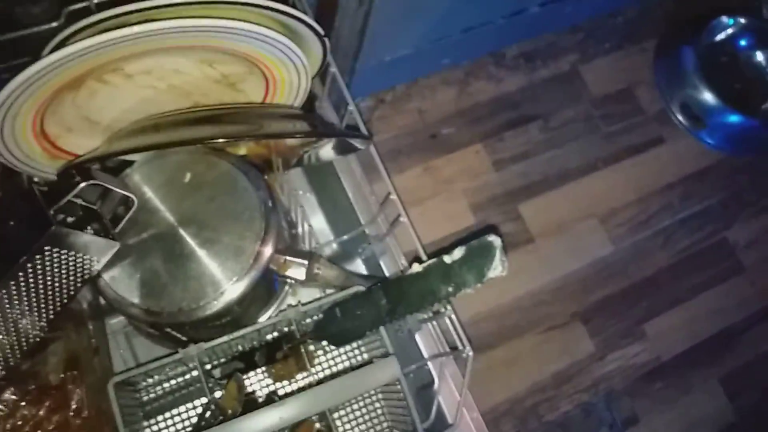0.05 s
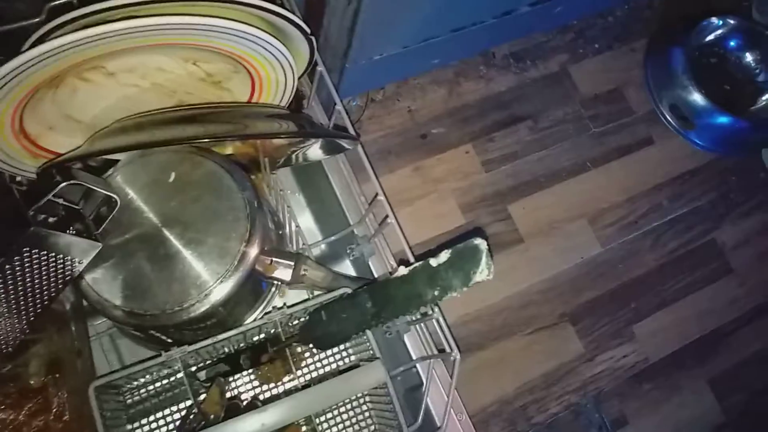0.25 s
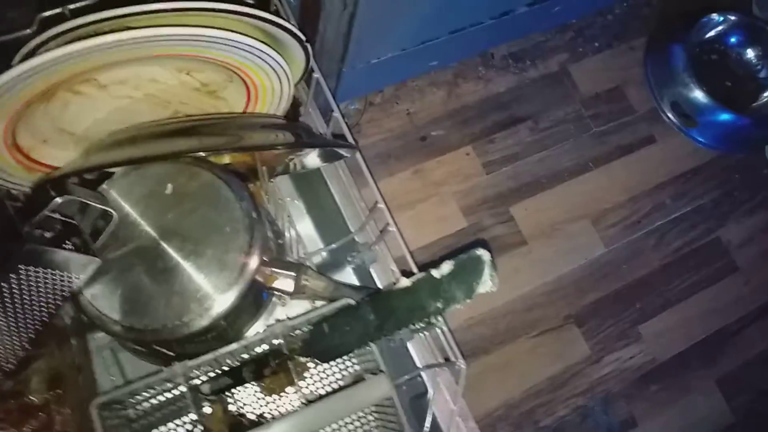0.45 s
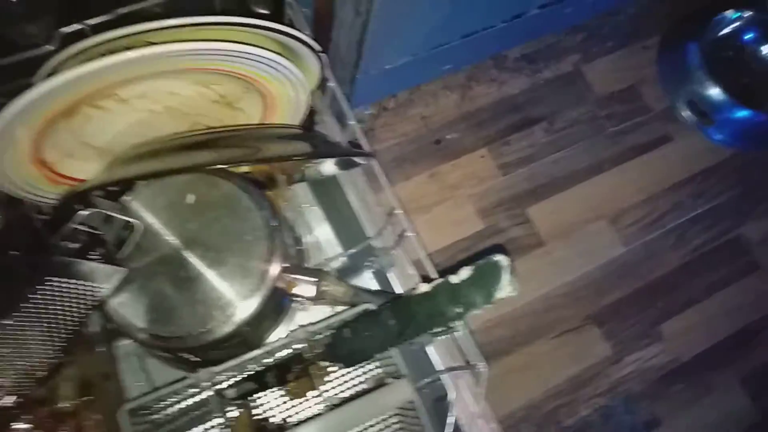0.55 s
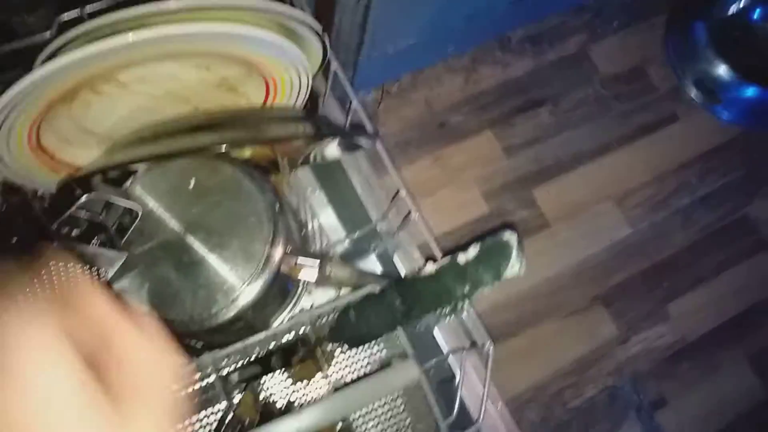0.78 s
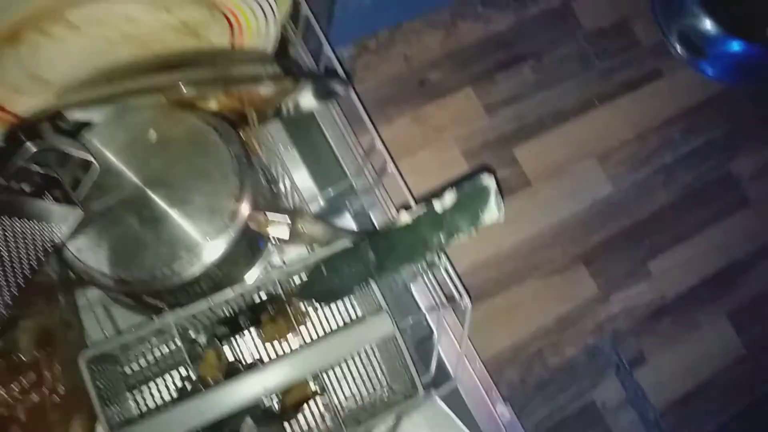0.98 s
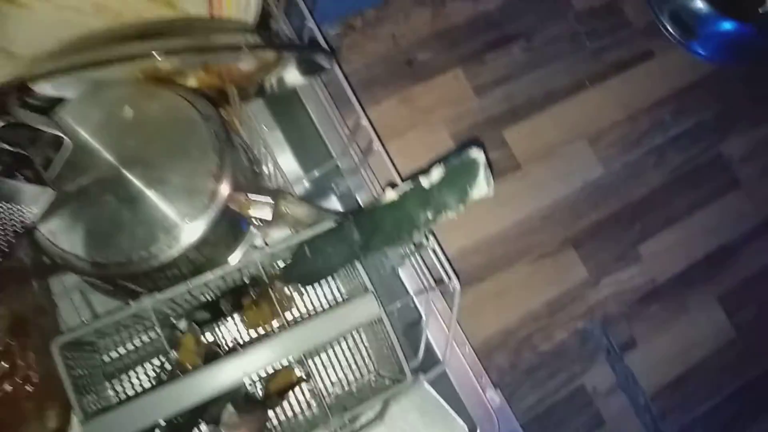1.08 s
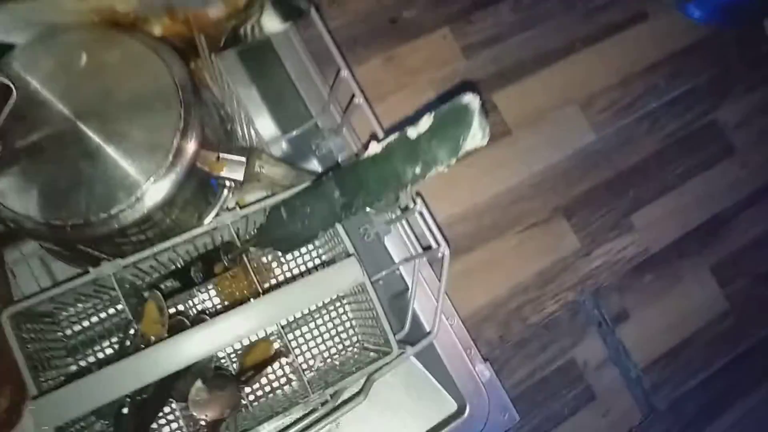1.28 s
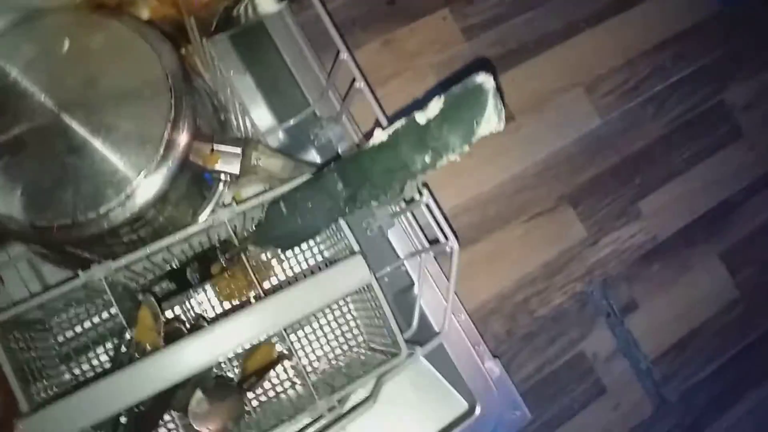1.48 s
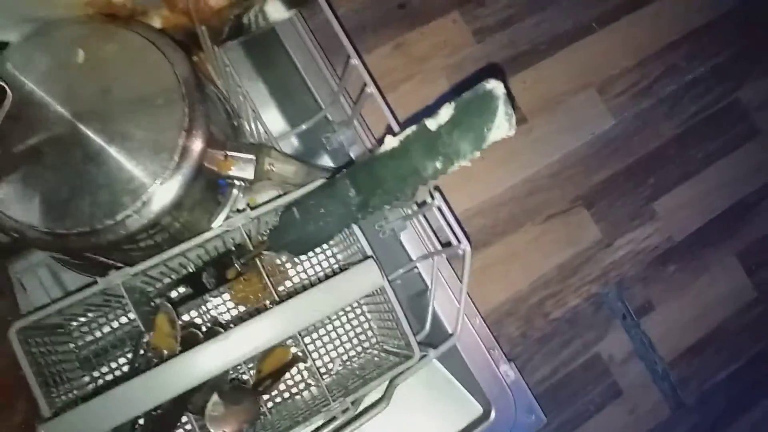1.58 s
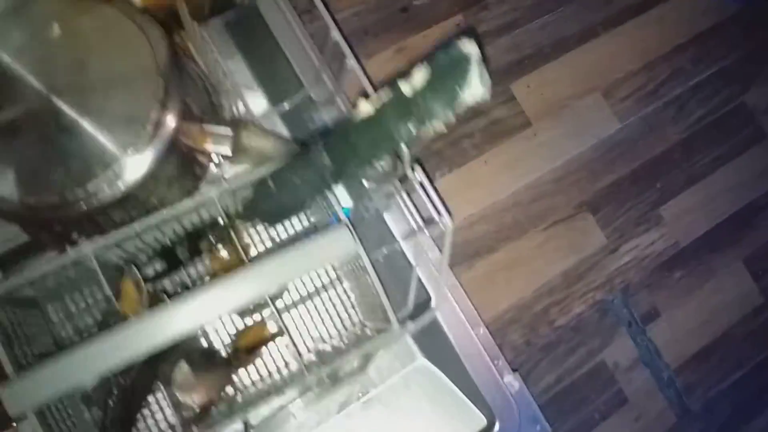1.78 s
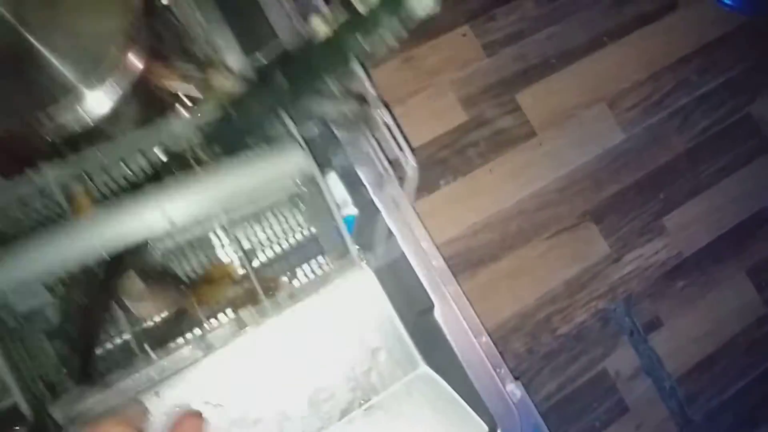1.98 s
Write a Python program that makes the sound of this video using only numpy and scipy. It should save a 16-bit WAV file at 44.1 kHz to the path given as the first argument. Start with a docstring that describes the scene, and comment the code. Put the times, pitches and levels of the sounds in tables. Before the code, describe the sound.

A loaded dishwasher rack rolls briefly and hits its stop with a low thud at about 0.3 seconds. The wire basket, plates, a pot and cutlery rattle, settling by 0.7 seconds. After faint room noise, a small steel clink comes at 1.4 seconds, then dull plastic knocks, strongest around 1.6. A soft sliding rub with light bumps swells until the end at 2 seconds, all close in a small kitchen.

```python
"""A small, quiet kitchen; one microphone, close to the dishwasher.
The loaded rack rolls and bumps against its stop: the wire basket clatters, the tub booms, and a pot,
plates and cutlery ring and settle within the first second. After a pause a small piece of steel clinks,
something plastic knocks, the door panel bumps, and a sliding rub swells up to the end."""
import sys
import numpy as np
from scipy import signal
from scipy.fft import rfft, irfft, next_fast_len
from scipy.io import wavfile
from scipy.ndimage import map_coordinates

SR = 44100
rng = np.random.default_rng(int(sys.argv[2]) if len(sys.argv) > 2 else 0)


def unload_audio(sound):
    """Save the sound as a 16-bit wav file, at the path given as the first command line argument."""
    columns = np.transpose(np.atleast_2d(sound))
    # keep every value between -1 and 1, then stretch to whole-number steps
    steps = np.round(np.clip(columns, -1, 1) * 32767)
    wavfile.write(sys.argv[1], SR, steps.astype(np.int16))


N = 90404


def amp(db):
    """Decibels to gain."""
    return 10 ** (np.asarray(db) / 20)


def unit(x):
    """x scaled to rms 1."""
    return x / np.sqrt(np.mean(x ** 2) + 1e-20)


def along(points, hz):
    """Read (frequency [Hz], value) points along a log frequency axis."""
    freqs, values = np.transpose(points)
    return np.interp(np.log(hz + 1), np.log(freqs + 1), values)


def level(rows):
    """Gain per sample from (time [s], level [dB]) points."""
    return amp(np.interp(np.arange(N) / SR, *np.transpose(rows)))


def wobble(rate):
    """A smooth random curve with rate knots a second."""
    return map_coordinates(rng.standard_normal(int(N * rate / SR) + 4), [np.arange(N) * rate / SR])


def filtered(x, response):
    """x through a filter whose gain is response(hz)."""
    size = next_fast_len(N + SR // 2)
    return irfft(rfft(x, size) * response(np.fft.rfftfreq(size, 1 / SR)), size)[:N]


def noise(colour, band=(0, np.inf), ripple_db=0, ripple_hz=44.52):
    """Coloured noise of rms 1 inside a band; random ripple in its spectrum gives crowded resonances."""
    knots = rng.standard_normal(4096)

    def response(hz):
        ripple = ripple_db * map_coordinates(knots, [hz / ripple_hz], mode="mirror")
        return amp(along(colour, hz) + ripple) * (hz > band[0]) * (hz < band[1])
    return unit(filtered(rng.standard_normal(N), response))


def since(start):
    """Seconds since start, zero before it."""
    return np.maximum(np.arange(N) / SR - start, 0)


def blow(start, rise, t60):
    """Envelope of a blow: quick rise, exponential decay (times in seconds)."""
    t = since(start)
    return (1 - np.exp(-t / rise)) * np.exp(-np.log(1000) * t / t60)


def contacts(rows, colour, t60s, tail_db, tail_t60, grain_db):
    """Each contact stirs many short, overlapping resonances, with fine chatter and a weaker long tail."""
    # body, middle and treble bands (low edge [Hz], high edge [Hz])
    bands = [(165, 950), (950, 3000), (3000, 17000)]
    out = np.zeros(N)
    for k, (band, t60) in enumerate(zip(bands, t60s)):
        crack_power = sum((amp(dbs[k]) * blow(s, rise, t60)) ** 2 for s, *dbs, rise in rows)
        tail_power = sum((amp(dbs[k] + tail_db) * blow(s, rise, tail_t60)) ** 2 for s, *dbs, rise in rows)
        chatter = unit(amp(grain_db * wobble(500)))
        out += np.sqrt(crack_power * chatter ** 2 + tail_power) * noise(colour, band, ripple_db=4)
    return out


def ring(modes, hits, rise, scatter_db, loose):
    """An object's modes, struck anew at each blow; loose seating makes their phase waver."""
    out, t = np.zeros(N + SR), np.arange(SR // 2) / SR
    for start, hit_db in hits:
        for hz, mode_db, t60 in modes:
            drift = np.cumsum(rng.standard_normal(len(t))) * loose / np.sqrt(SR)
            envelope = (1 - np.exp(-t / rise)) * np.exp(-np.log(1000) * t / t60)
            gain = amp(hit_db + mode_db + scatter_db * rng.standard_normal())
            phase = 2 * np.pi * (hz * t + rng.random()) + drift
            out[round(start * SR):][:len(t)] += gain * envelope * np.sin(phase)
    return out[:N]


def room_tone():
    """The kitchen's faint background noise."""
    # loudness (time [s], level [dB]) and spectrum (frequency [Hz], relative level [dB])
    loudness = [(0, -58.5), (.95, -63.5), (1.05, -59), (1.17, -60.5), (1.27, -60.5), (2.05, -65)]
    colour = [(65, -43), (110, -14), (150, 0), (210, -16.5), (368, -14), (444, -17.5), (733, -27.5),
              (1160, -20), (1310, -23.5), (1690, -11.5), (2350, -17.5), (2500, -20.5), (6810, -19.5),
              (8560, -42.5), (16000, -27.5)]
    return level(loudness) * noise(colour)


def rolling():
    """The rack's wheels roll unevenly and the tub rumbles under them."""
    # loudness of each (time [s], relative level [dB])
    wheel_levels = [(0, -41.5), (.09, -44.5), (.18, -35), (.3, -30.5), (.45, -36), (.52, -35), (.6, -36),
                    (.68, -52), (.78, -60.5), (.95, -73), (1.1, -78)]
    rumble_levels = [(0, -38), (.1, -43), (.14, -37), (.23, -35), (.27, -30), (.33, -26), (.37, -29),
                     (.41, -26), (.46, -26), (.52, -41), (.59, -34), (.68, -45), (.88, -67), (1.18, -65),
                     (1.31, -70), (1.38, -58), (1.79, -60), (1.89, -50), (2.05, -42)]
    # their spectra (frequency [Hz], relative level [dB])
    wheel_colour = [(76, -33.5), (130, 0), (335, -8), (410, -17), (638, -11), (917, -20), (2180, -23.5),
                    (6210, -31), (8740, -53), (16000, -47.5)]
    rumble_colour = [(25, -26), (50, -20), (64, -15), (78, 0), (98, 0), (122, -1), (145, -18), (220, -32),
                     (500, -70)]
    wheels = level(wheel_levels) * unit(noise(wheel_colour) * amp(0.67 * wobble(90)))
    rumble = amp(-2.5) * level(rumble_levels) * noise(rumble_colour)
    return wheels + rumble


def clatter():
    """The wire basket and its load rattle against each other."""
    # contacts in the rack (time [s], body [dB], middle [dB], treble [dB], rise [s])
    hits = [(.143, -47, -44, -47, .002), (.157, -35.5, -34, -43, .002), (.181, -31.5, -35, -45, .003),
            (.205, -37, -24, -22.5, .002), (.229, -23, -17, -21, .003), (.2487, -18.5, -12.5, -18, .0006),
            (.2715, -19.5, -11.5, -21, 0.00054), (.281, -21, -36, -20, .002), (.304, -41, -22, -15.5, .004),
            (.319, -23, -23, -20, .003), (.340, -27.5, -23, -24, .003), (.374, -26.5, -25, -26, .003),
            (.384, -21, -32, -26.5, .003), (.402, -22.5, -26, -24.5, .003), (.429, -25, -19.5, -20, .002),
            (.441, -33, -22, -23, .002), (.458, -27, -22.5, -29, .003), (.526, -32.5, -35.5, -28.5, 0.0029),
            (.543, -41, -32, -30, .003), (.555, -26, -29.5, -26, .003), (.574, -26.5, -36, -32.5, .003),
            (.608, -59, -36.5, -43, .003), (.632, -44, -47, -59, .003), (.691, -64, -55.5, -66, .003)]
    # the basket's spectrum (frequency [Hz], relative level [dB])
    colour = [(76, -30), (130, 1), (150, -7), (481, -5), (589, -10), (1120, -10.5), (1710, -5.5),
              (2770, -13), (4150, -13.5), (5390, -17.5), (6730, -10), (8740, -39), (16000, -35.5)]
    return contacts(hits, colour, t60s=(.11, .085, .08), tail_db=-14.5, tail_t60=0.29, grain_db=1.5)


def snaps():
    """The first instant of a hard contact is a dry, wide-band snap."""
    # hard contacts (time [s], level [dB]) and their spectrum (frequency [Hz], relative level [dB])
    hits = [(0.248, -22), (.2722, -24), (1.503, -47), (1.5989, -34)]
    colour = [(700, -14.5), (1600, 0), (4000, -1), (7200, 0.5), (8500, -18.5), (16000, -14)]
    return sum(amp(db) * blow(s, rise=.0003, t60=.018) for s, db in hits) * noise(colour)


def dishes():
    """The jolt rings a steel pot, plates and a bowl; one more dish rocks as the load settles."""
    # resonances (frequency [Hz], relative level [dB], t60 [s])
    pot_modes = [(1382, -6.5, 0.13), (1540, -4.5, 0.21), (1770, 0, 0.12), (2136, -9, 0.065),
                 (2228, -1.5, 0.14), (3000, -5, .05), (3310, -7.5, 0.17)]
    plate_modes = [(1020, -16, 0.19), (1278, -9, .17), (1358, -8.5, 0.13), (1647, -17, .22),
                   (1666.3, -0.5, .15), (1767, -13.5, 0.096), (3020, -13.5, .1)]
    bowl_modes = [(2360, -2, .17), (2506, -4, 0.089), (2576, -5, 0.24), (2660, -4.5, 0.15),
                  (5040, -6.5, 0.22)]
    dish_modes = [(1140, -7, 0.087), (1222, 0, 0.11), (1310, -1.5, .16), (1340, -9, 0.19)]
    # blows (time [s], level [dB])
    pot_hits = [(0.2484, -17), (0.2714, -19)]
    plate_hits = [(.294, -24.5), (0.379, -24), (0.402, -22.5), (0.437, -18.5), (0.553, -31), (.585, -32.5),
                  (0.614, -44.5), (.648, -45.5), (0.689, -46.5)]
    bowl_hits = [(.304, -25), (.321, -27.5), (.384, -27), (.44, -30.5)]
    dish_hits = [(.528, -29.5), (.553, -29), (0.574, -34)]
    return (ring(plate_modes, plate_hits, rise=.002, scatter_db=-0.2, loose=4.4)
            + ring(dish_modes, dish_hits, rise=.0042, scatter_db=0.2, loose=11)
            + ring(bowl_modes, bowl_hits, rise=.002, scatter_db=1.2, loose=6.3)
            + ring(pot_modes, pot_hits, rise=.0007, scatter_db=0.2, loose=12))


def cabinet():
    """The tub booms softly under the rack; later the door panel is bumped."""
    # resonances (frequency [Hz], relative level [dB], t60 [s])
    tub_modes = [(186, -1.5, 0.43), (208.3, -3, 0.26), (304.5, -5.5, 0.64), (318.4, -12, 0.87),
                 (441.5, -5, 0.29), (473, -1, 0.43), (540.6, 2.5, .34), (650, -4, .3), (703.8, 1.5, 0.22)]
    panel_modes = [(114, -5.5, 0.147), (147, -10, 0.23), (190.5, -6.5, 0.13), (222.6, 0.5, .22),
                   (546.3, -12, 0.12)]
    # bumps (time [s], level [dB])
    tub_hits = [(.255, -30), (0.311, -31.5), (.43, -31.5), (.575, -39)]
    panel_hits = [(1.359, -46.5), (1.371, -40.5), (1.62, -39.5), (1.701, -41), (1.959, -36)]
    return (ring(tub_modes, tub_hits, rise=.007, scatter_db=-0.1, loose=5)
            + ring(panel_modes, panel_hits, rise=.003, scatter_db=-0.3, loose=5.4))


def thud(start=.2795, hz=96):
    """The rack meets its stop: one low, quickly damped tone."""
    return amp(-1) * blow(start, rise=.003, t60=.075) * np.sin(2 * np.pi * hz * since(start))


def cutlery():
    """A knife, spoons and forks jingle as they are shaken in the basket."""
    # resonances (frequency [Hz], relative level [dB], t60 [s])
    knife_modes = [(4240, -2, .18), (5661, -0.5, 0.14), (7660, -17, 0.066), (14400, -26.5, .08),
                   (15600, -23, .07)]
    spoon_modes = [(6860, 4.5, 0.088), (6950, -0.5, 0.052), (6960, -2.5, .06), (5210, -14, 0.18)]
    teaspoon_modes = [(4902, 0, 0.24), (6670, -3.5, .12), (7050, -3, 0.2)]
    fork_modes = [(4190, -7, .18), (4522, -11, 0.25), (4900, -12, .25), (5200, -13, 0.24),
                  (6420, -2.5, .15), (6497, -1, 0.048), (6690, -6.5, .1), (6910, -11, 0.28),
                  (9300, -30.5, 0.088), (12200, -24.5, .16), (13800, -24, .12), (15280, -25, .12),
                  (15700, -20, .12)]
    # blows (time [s], level [dB])
    knife_hits = [(.3005, -13)]
    spoon_hits = [(0.337, -19), (.346, -20), (.382, -25), (0.404, -33), (0.529, -37.5)]
    teaspoon_hits = [(.527, -33), (.557, -36.5)]
    fork_hits = [(.377, -30), (.43, -20), (.441, -25), (.529, -33), (.558, -32.5), (.61, -49)]
    return (ring(knife_modes, knife_hits, rise=.004, scatter_db=-1.0, loose=3)
            + ring(spoon_modes, spoon_hits, rise=.003, scatter_db=1.5, loose=12)
            + ring(teaspoon_modes, teaspoon_hits, rise=.0023, scatter_db=0.3, loose=8.37)
            + ring(fork_modes, fork_hits, rise=.003, scatter_db=-0.2, loose=4.4))


def slide():
    """A grainy sliding rub that swells."""
    # the swell (time [s], level [dB]) and its spectrum (frequency [Hz], relative level [dB])
    swell = [(1.34, -90.5), (1.4, -51), (1.56, -57.5), (1.66, -52.5), (1.77, -46.5), (1.86, -44),
             (1.95, -41), (1.99, -42.5), (2.03, -39.5)]
    colour = [(76, -34), (130, -12.5), (224, -0.5), (263, -7), (378, -9), (410, -8.5), (625, -12.5),
              (1010, -17.5), (1610, -14), (2830, -21), (7150, -25), (8740, -45), (16000, -36)]
    return level(swell) * unit(noise(colour) * amp(1.1 * wobble(160)))


def plastic_knocks():
    """Dull knocks on plastic, whose resonances die quickly."""
    # knocks (time [s], body [dB], middle [dB], treble [dB], rise [s])
    hits = [(1.3575, -56.5, -51, -47.5, 0.0023), (1.371, -43.5, -52, -49, 0.0044),
            (1.392, -38.5, -38, -48, 0.0038), (1.408, -41, -52, -40, .003),
            (1.499, -41.5, -45, -54.5, 0.00599), (1.518, -40.5, -46.5, -50, 0.0056),
            (1.565, -41.5, -43, -66, 0.0051), (1.5995, -39, -33, -32.5, 0.000607),
            (1.612, -39, -36.5, -44.5, 0.0025), (1.622, -25.5, -34, -38, 0.0035),
            (1.635, -34, -33.5, -54, .003), (1.695, -44, -58, -69.5, .004), (2.014, -44, -37, -47, 0.0024)]
    # the plastic's spectrum (frequency [Hz], relative level [dB])
    colour = [(65, -46), (110, -19.5), (264, -5.5), (444, -13), (547, -9), (981, -19), (1340, -15),
              (3350, -22), (6810, -26.5), (8560, -54), (16000, -36.5)]
    return contacts(hits, colour, t60s=(.08, .07, .055), tail_db=-10, tail_t60=0.19, grain_db=-0.6)


def clink():
    """Steel touches steel: hard ticks and a bright ring, with a light brush just before and after."""
    # resonances when struck and when brushed (frequency [Hz], relative level [dB], t60 [s])
    steel_modes = [(3190, -16.5, 0.073), (3416, -13, 0.14), (3426, -12, 0.057), (4640, -11.5, .09),
                   (4730, -14, .11), (4850, -15, 0.11), (5220, -15, .08), (5500, -14, 0.11),
                   (6868, -14, 0.21), (7100, -10, .07), (7330, 6, .028), (8930, -23.5, 0.12),
                   (10420, -18, 0.095), (12800, -15, 0.15), (14270, -17.5, 0.13), (15015, 0, .06),
                   (15064, -4.5, .065), (15430, -19, .08)]
    brush_modes = [(4640, 5.5, 0.083), (4790, -2, 0.076), (6950, -6.5, .09)]
    # touches (time [s], level [dB])
    steel_hits = [(1.3845, -24), (1.408, -36)]
    brush_hits = [(1.367, -46), (1.453, -49)]
    tick_hits = [(1.385, -18), (1.394, -27.5), (1.408, -32.5)]
    # the ticks' spectrum (frequency [Hz], relative level [dB])
    tick_colour = [(1500, -24.5), (3300, -12.5), (4000, -6.5), (4700, -1), (5500, -5.5), (6200, -8),
                   (7300, 5), (8200, -26.5), (10000, -24), (12000, -5), (14000, -12.5), (15100, 2),
                   (16300, -13)]
    ticks = sum(amp(db) * blow(s, rise=.0012, t60=.022) for s, db in tick_hits) * noise(tick_colour)
    return (ticks + ring(steel_modes, steel_hits, rise=.001, scatter_db=1.5, loose=8.4)
            + ring(brush_modes, brush_hits, rise=.0034, scatter_db=0, loose=13))


def kitchen_reverb(x):
    """The small room answers 5 ms later with a short tail, duller as it dies."""
    # the room's decay (frequency [Hz], t60 [s])
    decay_times = [(100, .5), (1000, 0.3), (6000, .3), (15000, .2)]
    hz, t, spectrum = signal.stft(rng.standard_normal(SR // 2), SR, nperseg=256)
    decay = np.exp(-np.log(1000) * t / along(decay_times, hz)[:, None])
    tail = signal.istft(spectrum * decay, SR, nperseg=256)[1]
    delayed = np.pad(x, (SR // 200, 0))
    return signal.fftconvolve(delayed, tail / np.linalg.norm(tail))[:N]


def scene():
    """Close perspective in mono: mostly direct sound, with a little room on the bright sources."""
    bright = dishes() + cutlery() + clink() + snaps()
    rack = rolling() + thud() + clatter()
    direct = rack + cabinet() + slide() + plastic_knocks() + bright
    return (direct + amp(-13.5) * kitchen_reverb(bright) + room_tone())[None]


def record(dry):
    """The microphone drops the deep bass, rounds peaks near full scale and cuts the highest treble."""
    low_cut_hz, top_hz = 52, 16200
    x = signal.sosfilt(signal.butter(3, low_cut_hz, "highpass", fs=SR, output="sos"), dry[0])
    rounded = x / (1 + x ** 10) ** (1 / 10)
    return filtered(rounded, lambda hz: hz < top_hz)[None]


dry = scene()
out = record(dry)
unload_audio(out)
```